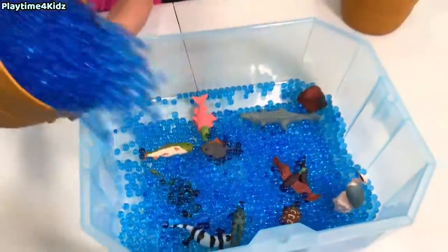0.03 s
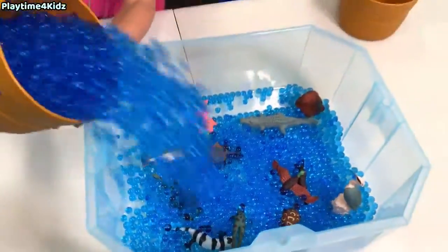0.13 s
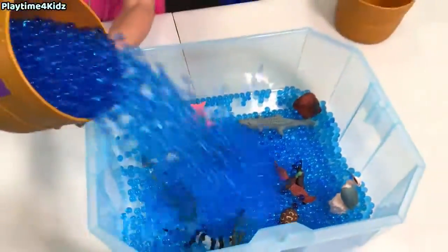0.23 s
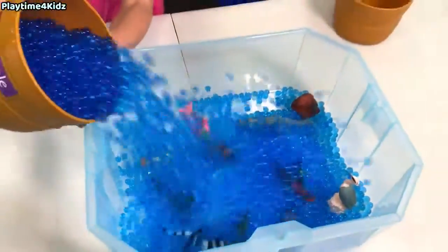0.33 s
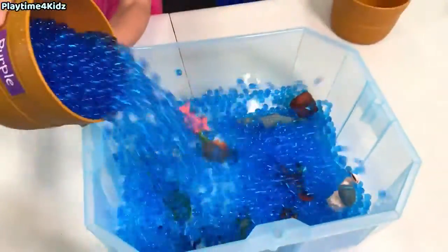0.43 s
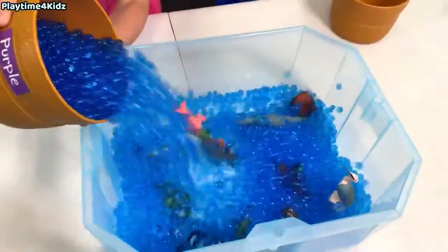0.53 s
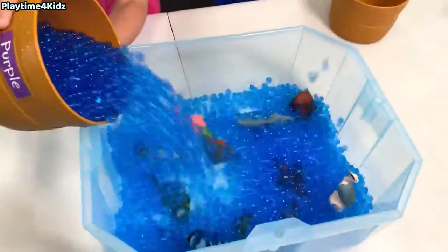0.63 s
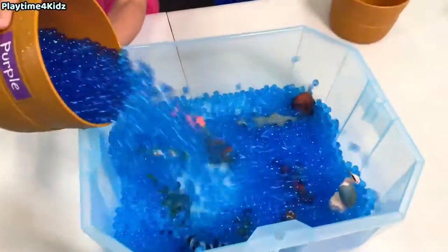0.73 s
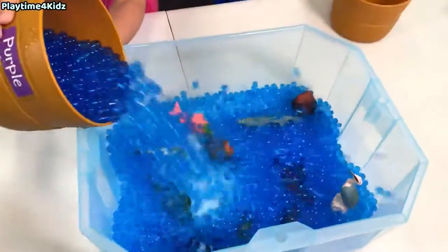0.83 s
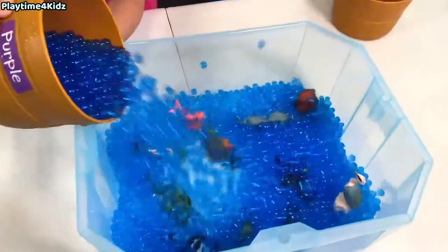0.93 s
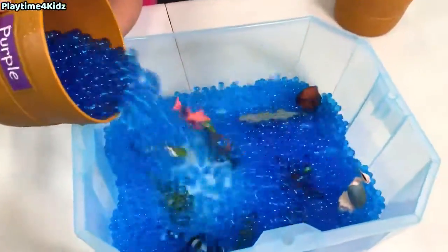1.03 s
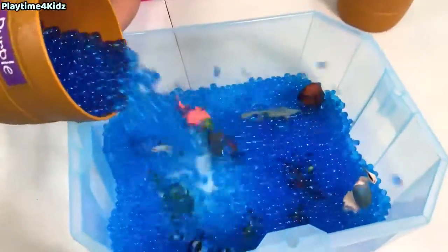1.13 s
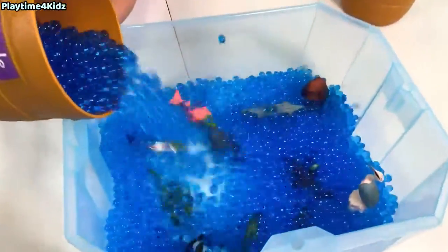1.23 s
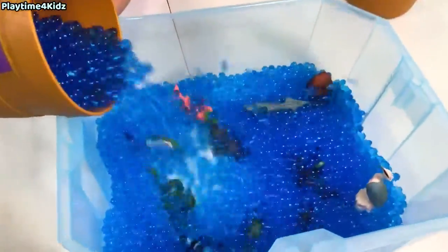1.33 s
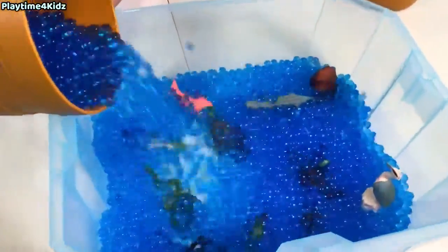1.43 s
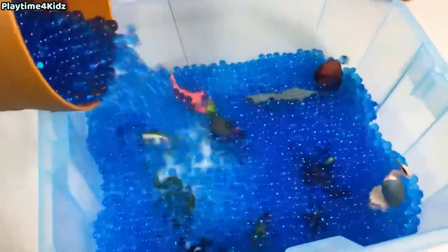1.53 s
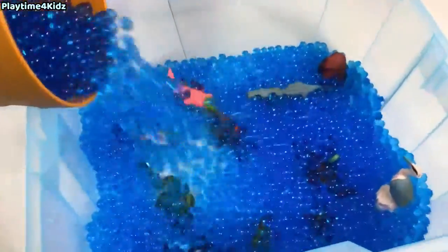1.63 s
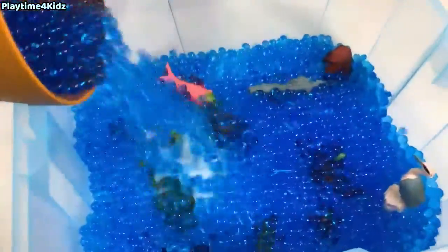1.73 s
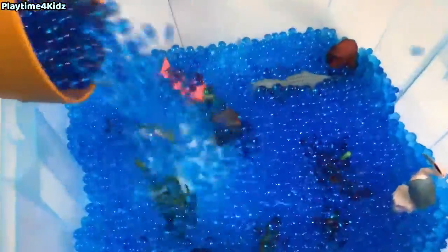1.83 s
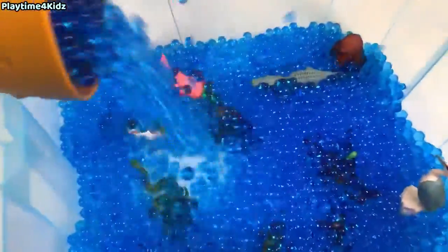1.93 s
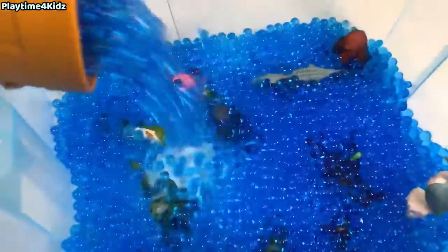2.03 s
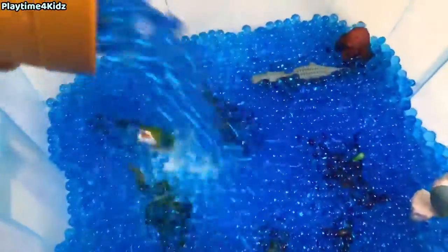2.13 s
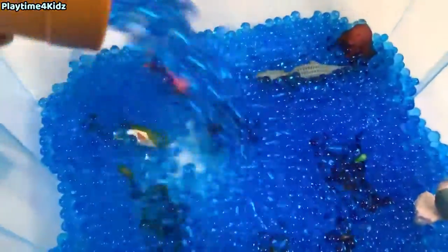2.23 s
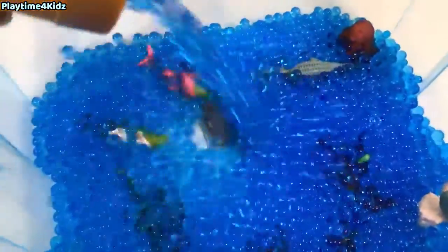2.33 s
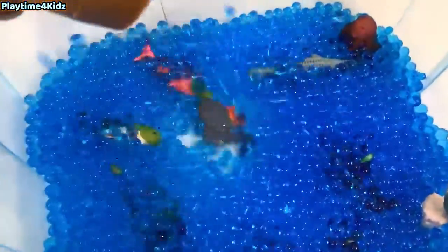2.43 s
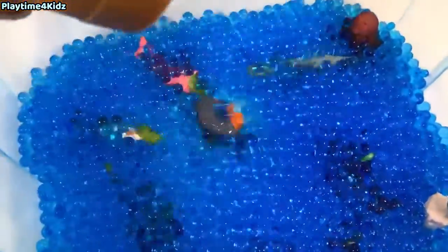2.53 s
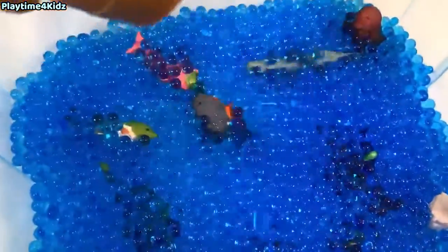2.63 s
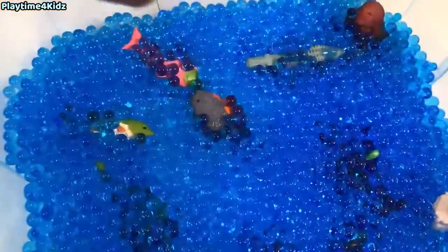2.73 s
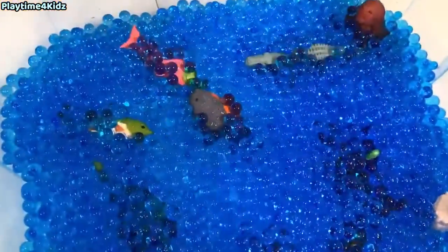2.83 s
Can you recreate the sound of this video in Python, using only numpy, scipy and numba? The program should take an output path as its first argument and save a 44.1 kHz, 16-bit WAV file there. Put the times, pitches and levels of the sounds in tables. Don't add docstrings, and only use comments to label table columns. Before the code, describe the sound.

Thousands of small water beads drum and splat into a plastic tub, ending in wet squelches

```python
import sys
import numpy as np
from scipy import signal
from scipy.fft import rfft, irfft
from scipy.io import wavfile
from scipy.ndimage import uniform_filter1d, map_coordinates
from numba import njit

SR = 44100
rng = np.random.default_rng(int(sys.argv[2]) if len(sys.argv) > 2 else 0)


def field_ratio(decibels):
    return 10 ** (np.asarray(decibels, dtype=float) / 20)


def dump_mix(stems):
    frames = np.atleast_2d(stems).T
    limited = np.clip(frames, -1, 1)
    pcm = np.round(limited * 32767).astype(np.int16)
    wavfile.write(sys.argv[1], SR, pcm)


N = 125685

# time in seconds, drumming level in dB, splat level relative to it in dB, dulling of the drumming
# above 230 Hz in dB per octave (negative brightens).
STREAM = [(0, -47.5, -4, 8), (0.154, -64.5, -6, -9), (0.186, -28, -18.5, 5.5), (.23, -32, -7.5, 0),
          (.3, -26, -10, -1.15), (.8, -23, -14, -1.2), (.9, -26.5, -15.5, -1.5), (1.019, -26.5, -10, -1.3),
          (1.4, -26.5, -15.5, -0.24), (1.78, -28, -11.5, -0.56), (2.2, -27, -22, 1),
          (2.45, -27, -23.5, 3.6), (2.56, -33.5, -24.5, 1.5), (2.62, -46, -24, 3), (2.72, -51, -9, -0.5),
          (2.85, -72.5, -1, -8)]
# frequency in Hz, T60 in seconds, level in dB.
BIN_MODES = [(67, 0.21, -6), (120.3, 0.1, -0.5), (175.6, 0.079, 0.5), (232.2, 0.26, 0.5),
             (269.4, 0.28, -2.5), (355, 0.025, -2.5), (411, 0.1, -3.5), (459.9, 0.11, -3),
             (606, 0.014, -3.5), (778, 0.024, -3), (1075, 0.011, -10), (1304, 0.036, -14),
             (1655, 0.017, -6.5), (2057, 0.0077, 0.5)]
# time in seconds, peak in dB.
SPLATS = [(0.217, -45), (0.229, -31), (0.2433, -26), (0.2953, -23), (0.358, -15.5), (0.4343, -22.5),
          (0.453, -42), (0.5619, -12), (0.5735, -22), (0.653, -20), (0.7463, -13.5), (0.782, -18),
          (0.821, -14.5), (0.9796, -14), (1.0374, -35), (1.2168, -15), (1.259, -11), (1.327, -13),
          (1.3417, -9), (1.4482, -23), (1.504, -22), (1.615, -21.5), (1.624, -25), (1.676, -22),
          (1.746, -16), (1.758, -40), (1.848, -18), (1.928, -24), (2.0984, -20), (2.1487, -20.5)]
# time in
# seconds, peak in dB.
MORE_SPLATS = [(0.267, -28), (0.3984, -39), (0.508, -32), (0.5416, -38), (0.619, -43), (0.689, -30),
               (0.8785, -39), (0.9384, -42), (1.0243, -25.5), (1.0734, -40), (1.197, -26), (1.4815, -44),
               (1.5564, -37), (1.715, -29), (1.7964, -31), (1.966, -36), (1.995, -36), (2.0546, -30),
               (2.14, -29), (2.231, -46), (2.2516, -31), (2.2763, -33), (2.287, -51), (2.3509, -23),
               (2.3816, -42), (2.4076, -32), (2.4306, -23), (2.4695, -29), (2.5164, -45)]
# time in seconds, peak in dB, centre in Hz.
SQUELCHES = [(2.2224, -45, 12200), (2.252, -18.5, 7670), (2.2644, -45, 13400), (2.2787, -29, 9600),
             (2.2895, -38, 12800), (2.2932, -16.5, 8800), (2.32, -31, 8800), (2.3346, -39, 13500),
             (2.3424, -24, 8400), (2.3522, -22, 8350), (2.3616, -31, 8300), (2.3825, -27, 9300),
             (2.393, -11, 9040), (2.4054, -15, 9000), (2.4264, -31.5, 5400), (2.44, -15, 9200),
             (2.444, -29.5, 6650), (2.45, -15, 7370), (2.466, -18.5, 8500), (2.4873, -28.5, 6970),
             (2.514, -27, 6830), (2.541, -38.5, 13200), (2.5845, -35, 8850)]
# time in seconds, peak
# in dB, centre in Hz.
SINGLE_BEADS = [
    (0.0034, -36, 3480),
    (0.0434, -39, 6300),
    (0.0583, -53, 5940),
    (0.086, -40, 5300),
    (2.6973, -32.5, 6060),
    (2.7716, -42, 12800),
    (2.7831, -37, 5040),
                (0.191, -28, 1800),
]
# time in seconds, peak in dB, pitch in Hz.
PLOPS = [(0.312, -12.5, 304), (0.402, -36, 373), (0.486, -12.5, 447), (0.527, -12, 279), (0.653, -46, 376),
         (0.694, -21, 270), (0.787, -17, 463), (0.821, -9, 263), (0.897, -16, 426), (0.985, -10, 780),
         (1.039, -20, 270), (1.176, -13.5, 455), (1.222, -43, 436), (1.257, -17, 260), (1.395, -20, 410),
         (1.512, -12.5, 410), (1.548, -12, 450), (1.618, -11, 790), (1.676, -9.5, 418), (1.718, -14, 398),
         (1.836, -15, 420), (1.892, -18, 363), (2.057, -22, 440), (2.141, -10.5, 450), (2.346, -14, 430),
         (2.408, -13, 412), (2.434, -11, 411), (2.521, -25, 353), (2.555, -20.5, 408), (2.583, -44, 286)]
# crest
# in seconds, level in dB, pitch in Hz.
BOOMS = [(0.273, -25, 118), (0.364, -17.5, 214), (0.515, -23.5, 114), (0.534, -18.5, 221),
         (0.658, -17, 236), (0.769, -18, 121), (0.795, -13.5, 226), (0.841, -21.5, 122), (1.038, -17, 221),
         (1.052, -31, 112), (1.188, -18, 229), (1.196, -29.8, 130), (1.291, -19.5, 222),
         (1.356, -21, 117.6), (1.436, -27, 124), (1.449, -17, 210), (1.505, -37, 123), (1.51, -24.5, 230),
         (1.68, -32, 214), (1.781, -31, 190), (1.945, -25.5, 111), (2.056, -24, 216), (2.076, -44, 116),
         (2.216, -21.5, 206), (2.224, -21.5, 109), (2.304, -32, 202), (2.317, -22, 113), (2.413, -25, 114),
         (2.414, -28, 188), (2.586, -25, 172),
         (2.5, -20.5, 110),
    (2.487, -30, 205),
    (2.555, -27, 80),
    (2.61, -37.5, 370),
    (2.65, -34.5, 164),
    (2.701, -39, 82),
    (2.729, -43.5, 189),
]
# time in seconds, peak in dB.
KNOCKS = [(0.334, -9), (0.4507, -22), (0.6532, -12.9), (0.6942, -14), (0.7924, -11), (0.8246, -15),
          (0.988, -11), (1.398, -8.5), (1.515, -21), (1.5601, -13), (1.6236, -28), (1.6773, -17),
          (1.7522, -8.5), (1.8383, -11), (1.8961, -12.5), (1.996, -13), (2.0602, -13.5), (2.1491, -16),
          (2.311, -17), (2.3503, -15.5), (2.4106, -17.5), (2.4351, -31)]
# frequency in Hz, level in dB.
WET_SPECTRUM = [(500, 2), (1150, -7.5), (1700, 3.5), (2150, -0.5), (2600, 1), (6200, -1.5), (9000, 3.5),
                (15000, -31)]
# frequency in Hz, gain in dB.
PORT_RESPONSE = [(4000, 2.5), (5000, 0.5), (6300, -2.5), (7500, -15.5), (8800, -12), (10200, -10.5),
                 (11500, -11.5), (13000, 5)]
# frequency in Hz, level in dB.
AIR_SPECTRUM = [(15, -35), (25, 16), (60, 17.5), (185, -2), (420, -16), (887, -10.5), (1130, -0.5),
                (1480, -7.5), (4870, -9), (6560, -10), (16000, -18.5)]
PATTER_EDGES_HZ = [300, 1300, 2600, 5000, 16000]

RISE_S = 0.0012
AIR_DB = -48.5
BEADS_PER_S, BEAD_SPREAD_DB, CONTACT_S, CLUMP_DB = 1100, 3.5, 0.00062, 2.5
SURGE_T60_S, SURGE_DEPTH = 0.058, 0.69
PATTER_PER_S, PATTER_SPREAD_DB, PATTER_T60_S, PATTER_DB = 700, 1.5, 0.013, 5.5
SPLAT_HOLD_S, SPLAT_T60_S, SPLAT_DB, MORE_SPLATS_DB = 0.002, 0.02, -3, 5
TICK_PER_S, TICK_DB, TICK_CYCLES, TICK_SPREAD_DB = 800, -1.5, 10, 3.5
BOOM_CYCLES, BOOM_DB, BOOM_GLIDE = 19.75, -5.5, -0.022
PLOP_CYCLES, PLOP_DB, PLOP_GLIDE = 12.4, -10.5, -0.047
KNOCK_HZ, KNOCK_CYCLES, KNOCK_DB = 507, 2.56, -7
SQUELCH_T60_S, SQUELCH_WIDTH, SQUELCH_DB = 0.024, 0.097, 9.5
FIZZ_FROM_S, FIZZ_TO_S, FIZZ_DB, FIZZ_PER_S = 2.24, 2.485, -33, 560
ROOM_T60_S, ROOM_DB = 0.3, -12.5
RIGHT_LAG_S, APART_HZ, BASS_CUT_HZ = 0.00012, 1450, 83


def norm(x):
    return x / np.sqrt(np.mean(x ** 2))


def log_interp(hz, table):
    points_hz, points_db = np.array(table).T
    return np.interp(np.log(hz), np.log(points_hz), points_db)


def colour(x, table):
    f = np.maximum(np.fft.rfftfreq(4096, 1 / SR), 1)
    cepstrum = irfft(np.log(field_ratio(log_interp(f, table))))
    cepstrum[1:2048] *= 2
    cepstrum[2049:] = 0
    response = irfft(np.exp(rfft(cepstrum)))
    return signal.fftconvolve(x, np.atleast_2d(response), axes=-1)[:, :N]


def bandpass(x, edges_hz):
    return signal.sosfilt(signal.butter(2, edges_hz, "band", fs=SR, output="sos"), x)


def mode(x, hz, t60):
    pole = np.exp(2j * np.pi * hz / SR - np.log(1000) / (t60 * SR))
    return signal.lfilter([1], [1, -pole], x).imag * np.sqrt(1 - abs(pole))


def walk(rate):
    k = int(SR / rate)
    held = np.repeat(rng.standard_normal(N // k + 1), k)[:N]
    return norm(uniform_filter1d(held, k))


def hail(per_s, spread_db):
    chance = rng.random(N)
    strength = rng.exponential(size=N)
    return (chance < per_s / SR) * field_ratio(spread_db * np.minimum(strength, 5))


def decay(x, t60, hold=0.):
    t = np.arange(int(.2 * SR)) / SR
    fade = field_ratio(-60 * np.maximum(t - hold - RISE_S, 0) / t60)
    shape = np.minimum(t / RISE_S, 1) * fade
    return np.abs(signal.fftconvolve(x, shape)[:N])


def hiss(apart):
    common, differing = rng.standard_normal((2, N))
    differing = signal.lfilter(*signal.butter(1, APART_HZ, "high", fs=SR), differing)
    return common + apart * differing * np.array([[1], [-1]])


def sides(db):
    return field_ratio(np.array([[db], [-db]]) / 2)


def spikes(times, dbs):
    x = np.zeros(N)
    x[(np.asarray(times) * SR).astype(int)] = field_ratio(dbs)
    return x


def pops(rows, t60, width, db):
    out = np.zeros((2, N))
    t = np.arange(int(0.032 * SR)) / SR
    for s, peak_db, hz in rows:
        n = rng.standard_normal((3, len(t)))
        n = n[0] + 2.3 * n[1:]
        n = n * field_ratio(-60 * t / t60) * np.minimum(t / RISE_S, 1) ** 2
        n = bandpass(n, [hz / (1 + width), min(hz * (1 + width), .45 * SR)])
        burst = n / np.abs(n).max() * field_ratio(peak_db + db) * sides(-2.3)
        i = int((s - RISE_S / 2) * SR)
        out[:, i:i + len(t)] += burst[:, :N - i]
    return out


@njit
def grains(start, hz, cycles, glide, gain, out):
    y = np.zeros_like(out)
    for k in range(len(start)):
        n = int(cycles[k] * SR / hz[k])
        phase = 0.
        for i in range(min(n, y.shape[1] - start[k])):
            u = i / n
            phase += 2 * np.pi * hz[k] * (1 + glide[k] * u) / SR
            v = np.sin(phase) * 27.2 * u * np.exp(-10 * u)
            y[0, start[k] + i] += gain[0, k] * v
            y[1, start[k] + i] += gain[1, k] * v
    return y


def tones(start_s, hz, cycles, glide, gain):
    one = np.ones(len(hz))
    start = (start_s * SR).astype(np.int64)
    return grains(start, hz, cycles * one, glide * one, gain, np.zeros((2, N)))


def air():
    crackle = np.hypot(1, .5 * norm(decay(hail(120, 5.0), .012)))
    noise = hiss(0.41) * crackle * field_ratio(0.62 * walk(9.16))
    return norm(colour(noise, AIR_SPECTRUM)) * field_ratio(AIR_DB)


def stray_beads():
    return pops(SINGLE_BEADS, 0.0097, 0.12, 2.0)


def bunching():
    times = [row[0] for row in SPLATS + PLOPS + MORE_SPLATS]
    surge = np.minimum(decay(spikes(times, 0), SURGE_T60_S, 0.0049), 1.5)
    surge = (surge - surge.mean()) / surge.std()
    return 0.42 * walk(22.02) + 0.33 * walk(60) + SURGE_DEPTH * surge


def drum(level_db, dull, clumps):
    push = signal.windows.hann(int(CONTACT_S * SR) + 3)
    blows = norm(hail(BEADS_PER_S, BEAD_SPREAD_DB) * field_ratio(CLUMP_DB * clumps)) * field_ratio(level_db)
    ring = np.zeros((2, N))
    for hz, t60, db in BIN_MODES:
        damped = blows * field_ratio(-dull * max(np.log2(hz / 230), 0))
        force = damped * rng.standard_normal(N)
        ring += field_ratio(db) * sides(5.1 * min(hz / 1100, 1) ** 2) * mode(force, hz, t60)
    unit = np.sqrt(np.sum(field_ratio(np.array(BIN_MODES)[:, 2]) ** 2)) / 2 * np.sum(push)
    return field_ratio(-1.5) * signal.fftconvolve(ring, push[None], axes=1)[:, :N] / unit


def splats(level_db, clumps):
    s, db = np.array(SPLATS + [(s, db + MORE_SPLATS_DB) for s, db in MORE_SPLATS]).T
    big = decay(spikes(s - RISE_S / 2, db + SPLAT_DB), SPLAT_T60_S, SPLAT_HOLD_S)
    noise = hiss(0.79)
    out = np.zeros((2, N))
    for edges in zip(PATTER_EDGES_HZ, PATTER_EDGES_HZ[1:]):
        landings = hail(PATTER_PER_S, PATTER_SPREAD_DB) * field_ratio(2 * clumps)
        patter = norm(decay(landings, PATTER_T60_S)) * field_ratio(level_db + PATTER_DB)
        out += bandpass(noise, edges) * np.hypot(patter, big)
    return colour(out, WET_SPECTRUM) / np.std(colour(noise, WET_SPECTRUM)) * sides(0.18)


def ticks(level_db, clumps):
    size = hail(TICK_PER_S, TICK_SPREAD_DB) * field_ratio(3 * clumps)
    at = np.flatnonzero(size)
    pitch, length = rng.random((2, len(at)))
    place, slide = rng.standard_normal((2, len(at)))
    hz = 700 * 2 ** (3.4 * pitch)
    wet_db = log_interp(hz, WET_SPECTRUM) + 10 * np.log10(hz / 1800)
    gain = size[at] * field_ratio(wet_db) * sides(2 + 4 * place).reshape(2, -1)
    cycles = TICK_CYCLES * (.7 + length) * np.sqrt(hz / 1800)
    tone = grains(at, hz, cycles, 0.13 * slide, gain, np.zeros((2, N)))
    return norm(tone) * field_ratio(level_db + TICK_DB)


def booms():
    s, db, hz = np.array(BOOMS).T
    start = s - .15 * BOOM_CYCLES / hz
    return tones(start, hz, BOOM_CYCLES, BOOM_GLIDE, field_ratio(db + BOOM_DB) * sides(0.33))


def plops():
    s, db, hz = np.array(PLOPS).T
    return tones(s, hz, PLOP_CYCLES, PLOP_GLIDE, field_ratio(db + PLOP_DB) * sides(0.36))


def knocks():
    s, db = np.array(KNOCKS).T
    hz = KNOCK_HZ * field_ratio(1.5 * rng.standard_normal(len(s)))
    return tones(s - .3 / hz, hz, KNOCK_CYCLES, BOOM_GLIDE, field_ratio(db + KNOCK_DB) * sides(0.33))


def squelches():
    return pops(SQUELCHES, SQUELCH_T60_S, SQUELCH_WIDTH, SQUELCH_DB)


def fizz(t):
    opening = np.clip((t - FIZZ_FROM_S) / 0.02, 0, 1)
    closing = np.clip((FIZZ_TO_S - t) / 0.1 + 1, 0, 1)
    tears = norm(decay(hail(FIZZ_PER_S, 1.8) * field_ratio(2.0 * walk(40)), 0.012))
    spectrum = [(1500, -14), (2800, 0), (5000, -1.5), (9500, 14.5), (14000, -14)]  # Hz, dB
    return norm(colour(hiss(0.75) * tears, spectrum)) * opening * closing * field_ratio(FIZZ_DB)


def reverberation(near, t):
    tail = t[:int(.4 * SR)]
    spectrum = [(250, -24), (1200, 0), (3000, -4), (9000, -20)]  # Hz, dB
    echo = colour(hiss(.9)[:, :len(tail)], spectrum)[:, :len(tail)]
    echo = echo * field_ratio(-60 * tail / ROOM_T60_S) * np.minimum(tail / 0.0081, 1)
    echo = echo / np.sqrt(np.sum(echo[0] ** 2))
    return field_ratio(ROOM_DB) * signal.fftconvolve(near, echo, axes=1)[:, :N]


def scene():
    t = np.arange(N) / SR
    at, drum_db, wet_rel_db, dulling = np.array(STREAM).T
    level = np.interp(t, at, drum_db)
    wet = np.interp(t, at, drum_db + wet_rel_db)
    dull = np.interp(t, at, dulling)
    clumps = bunching()
    near = stray_beads() + drum(level, dull, clumps) + splats(wet, clumps) + ticks(wet, clumps)
    near = near + booms() + plops() + knocks() + squelches() + fizz(t)
    room = reverberation(near, t)
    late = map_coordinates(near[1], [(t - RIGHT_LAG_S) * SR], mode="nearest")
    bass_cut = signal.butter(2, BASS_CUT_HZ, "high", fs=SR, output="sos")
    heard = signal.sosfilt(bass_cut, np.array([near[0], late]) + room)
    return colour(heard, PORT_RESPONSE) + air()


def roll_off(x):
    return signal.sosfilt(signal.butter(12, 16480, fs=SR, output="sos"), x)


def record(dry):
    mix = colour(dry, [(14500, -1.0), (15600, -3), (16200, -30)])
    return roll_off(mix)


dry = scene()
out = record(dry)
dump_mix(out)
```